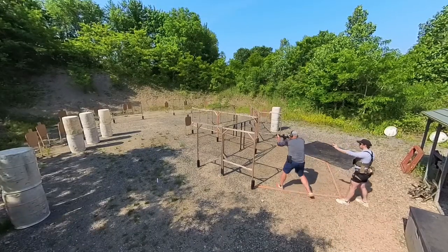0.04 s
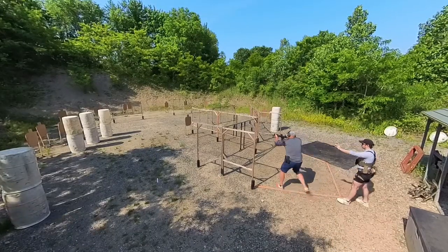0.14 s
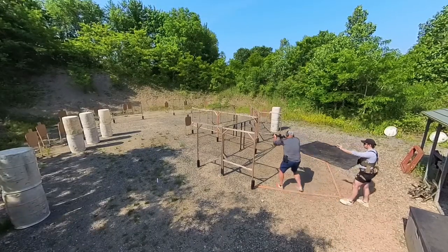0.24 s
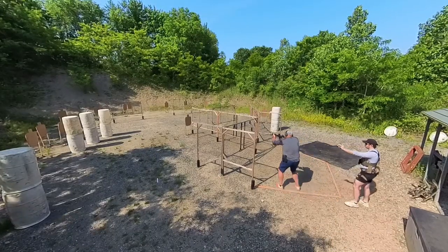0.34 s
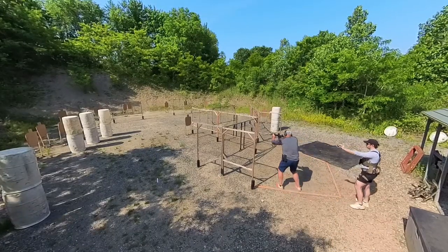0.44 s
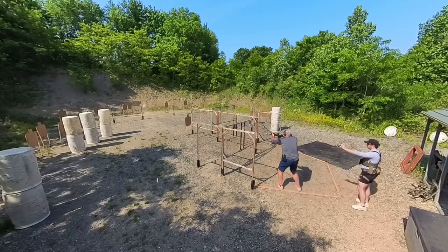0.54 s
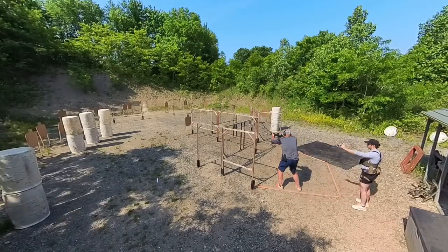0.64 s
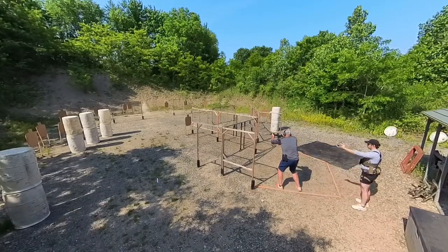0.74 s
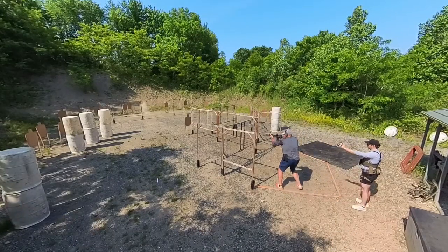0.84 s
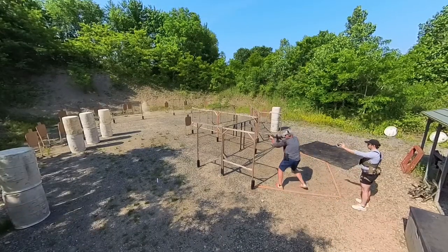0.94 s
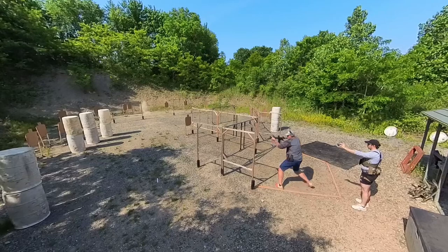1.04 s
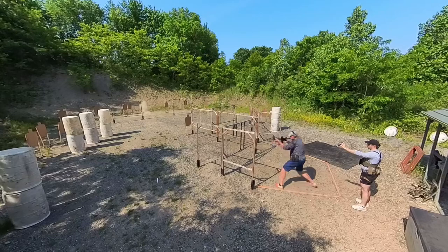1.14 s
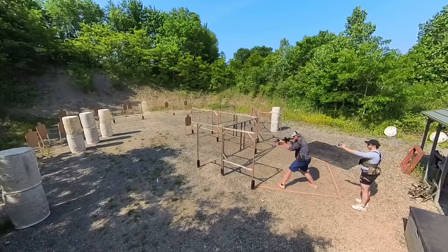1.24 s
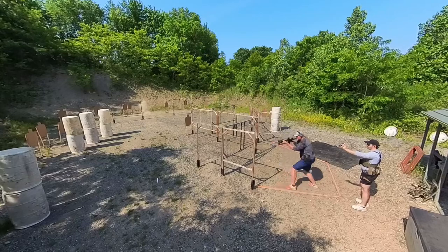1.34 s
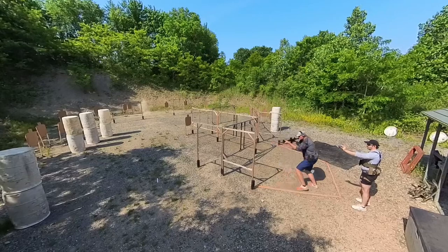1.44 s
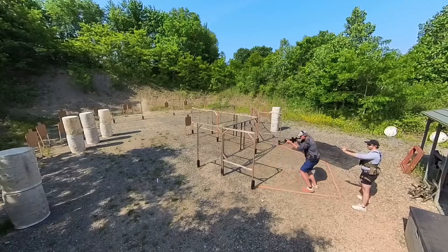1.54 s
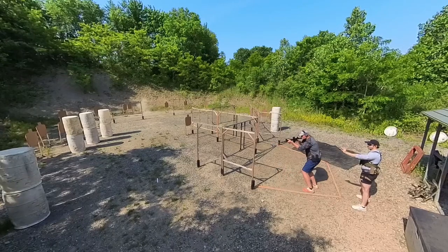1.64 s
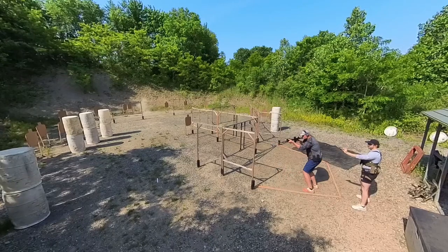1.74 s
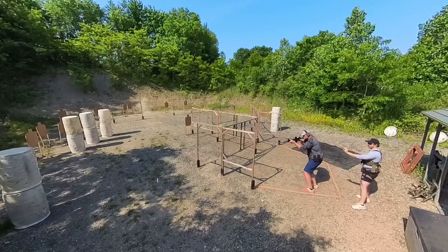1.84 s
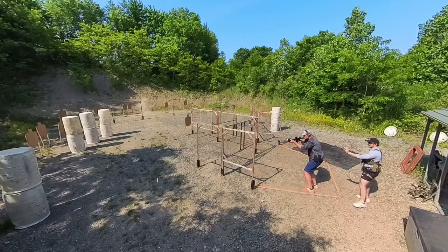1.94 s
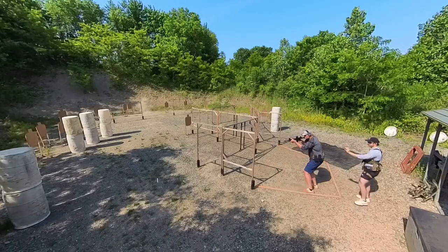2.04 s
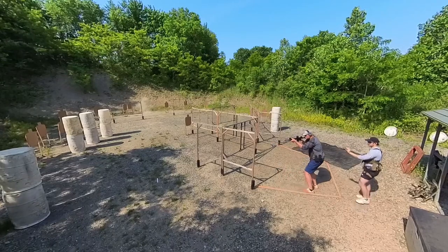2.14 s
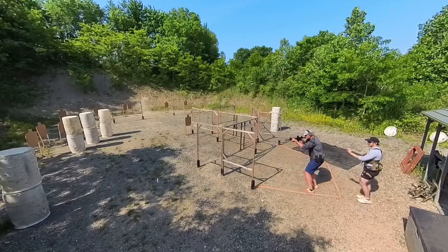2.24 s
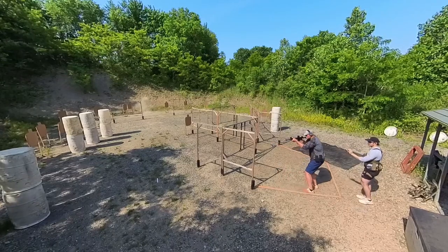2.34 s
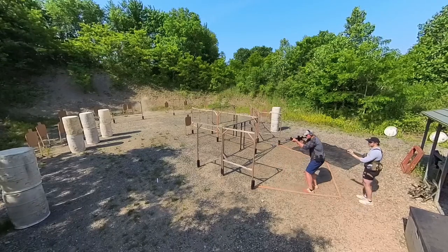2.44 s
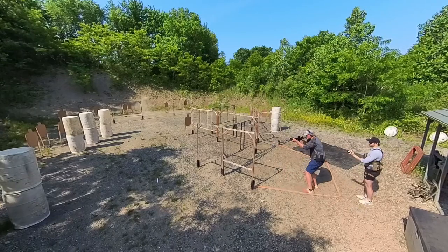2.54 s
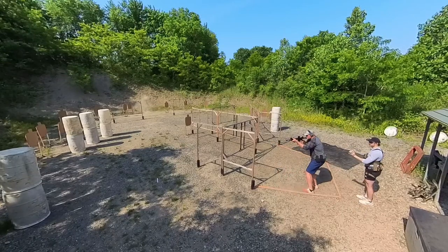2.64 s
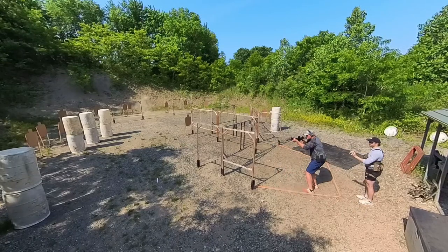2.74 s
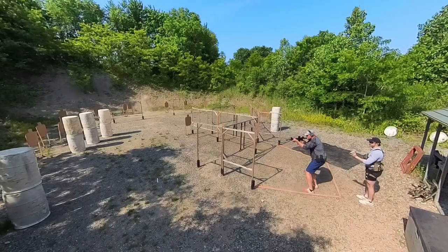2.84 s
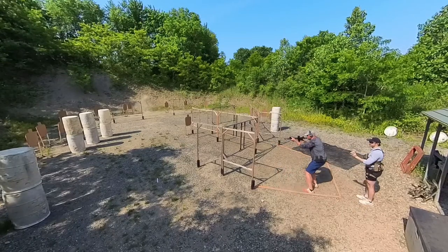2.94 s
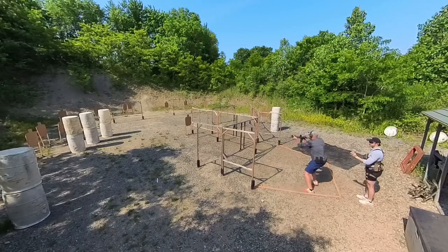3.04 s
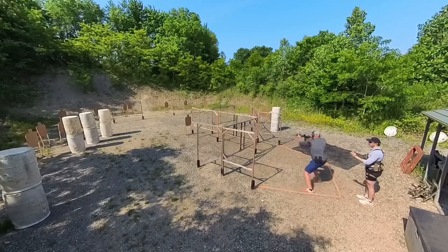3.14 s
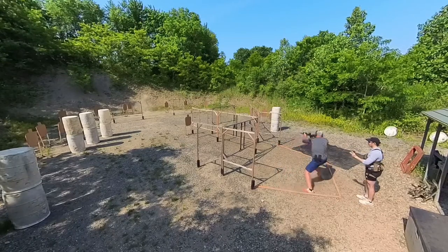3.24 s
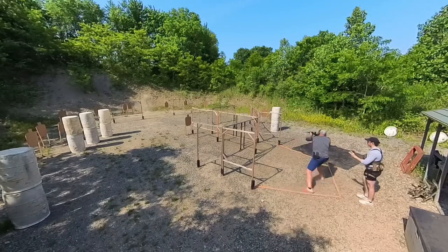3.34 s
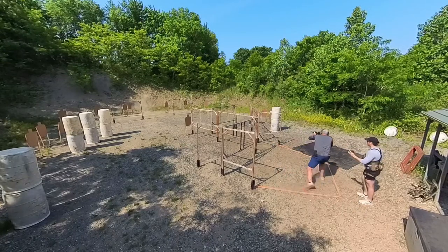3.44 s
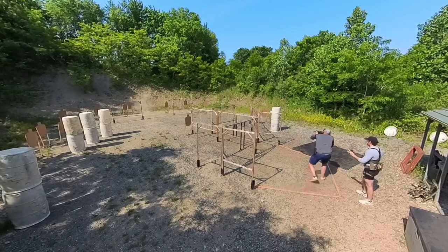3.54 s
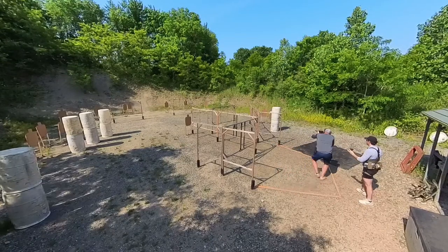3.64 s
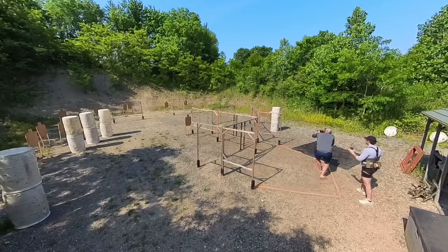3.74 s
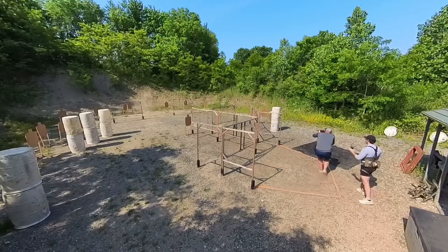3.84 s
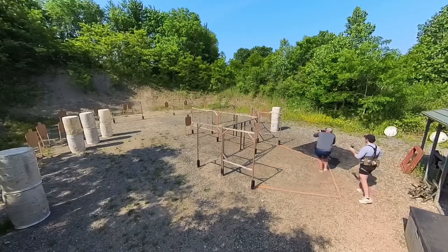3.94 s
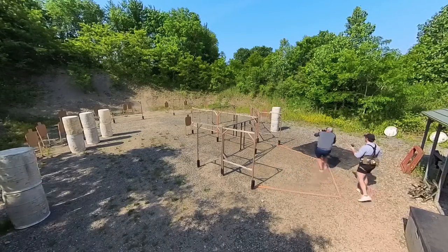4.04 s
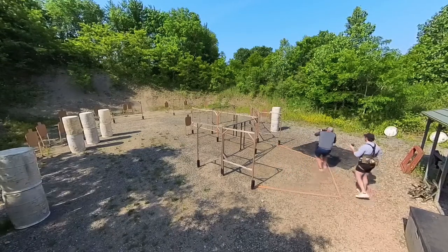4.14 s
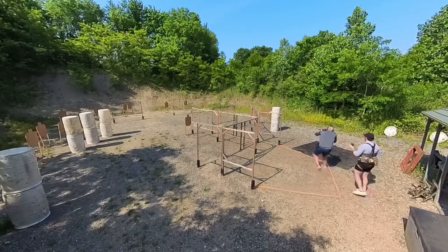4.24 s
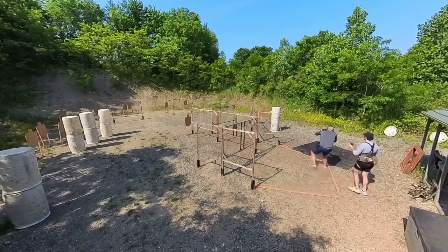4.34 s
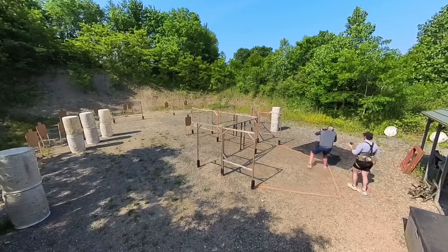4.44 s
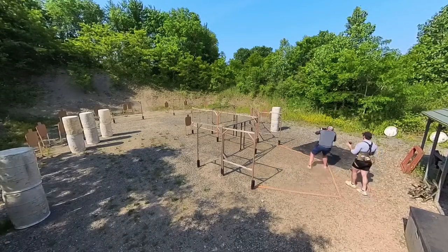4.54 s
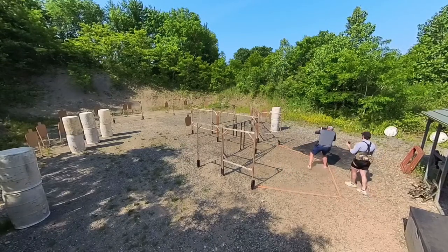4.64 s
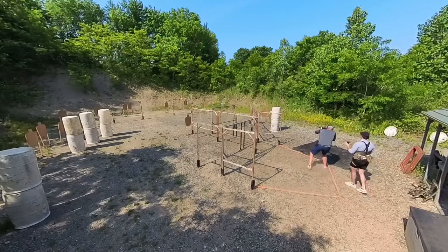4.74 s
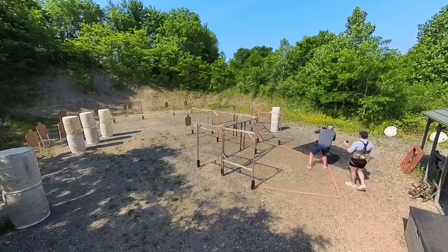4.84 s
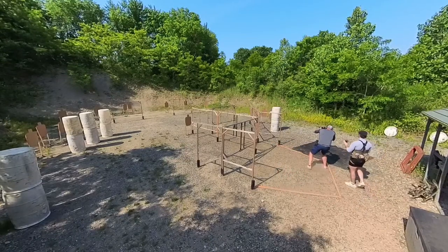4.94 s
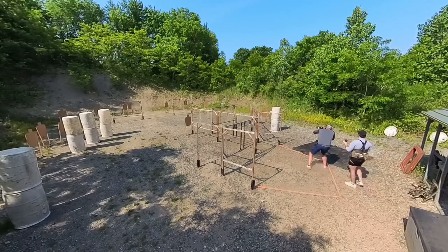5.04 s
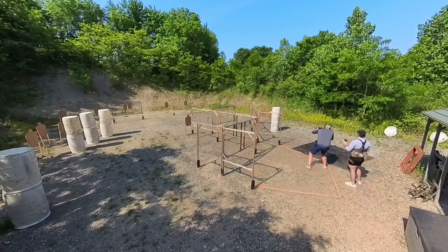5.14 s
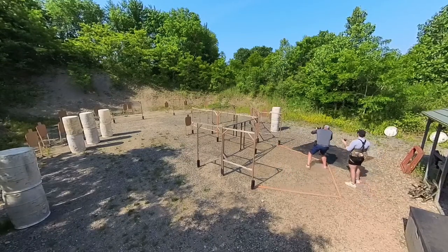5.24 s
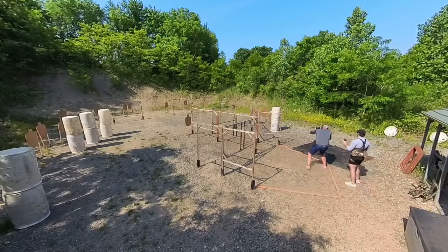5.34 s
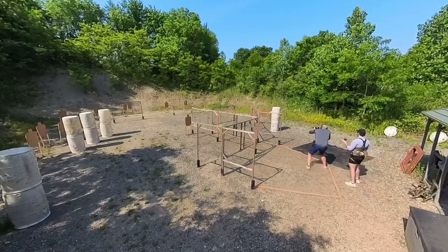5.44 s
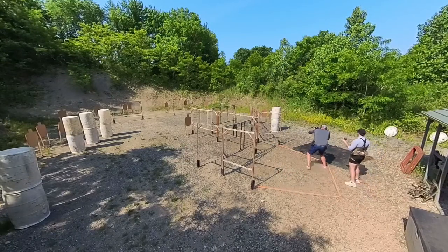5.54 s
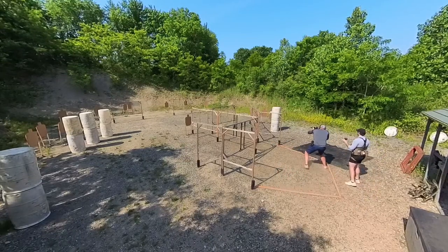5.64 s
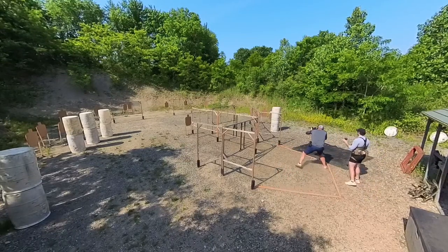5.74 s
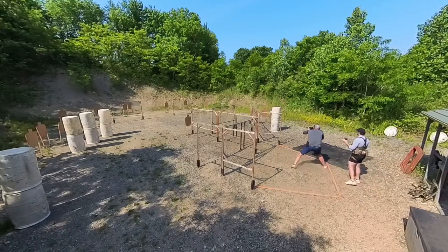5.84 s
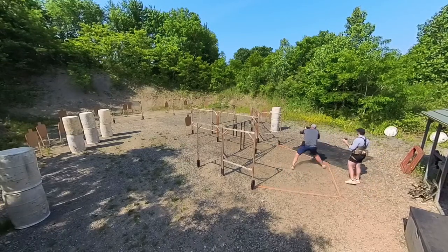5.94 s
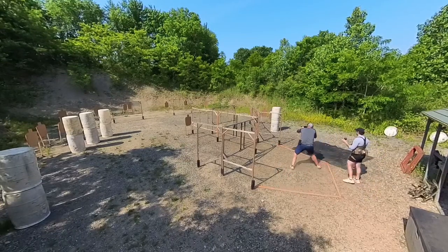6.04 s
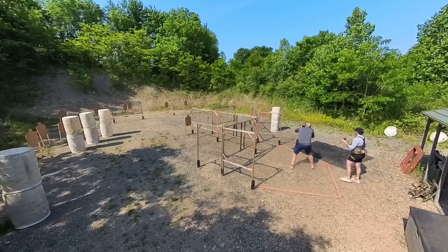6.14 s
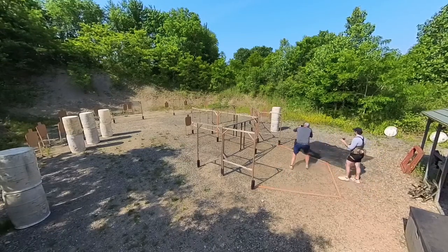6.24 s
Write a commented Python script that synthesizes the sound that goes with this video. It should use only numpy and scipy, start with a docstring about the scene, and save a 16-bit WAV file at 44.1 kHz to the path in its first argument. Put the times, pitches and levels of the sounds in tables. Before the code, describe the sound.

Twelve loud rifle shots, mostly in quick pairs, echo around an outdoor range, with gravel footsteps and spent casings tinkling between them.

```python
"""A gravel bay ringed by earth banks and trees: twelve rifle shots, mostly in quick pairs, from three
stances. Each blast is a shock wave that reflects off nearby props, rumbles between the banks and rolls
back as scattered sound from stones and foliage. Between shots the shooter's steps grind the gravel and
spent brass cases ring on the stones, over a distant drone and rustling trees.
The microphone saturates on the shock fronts, and a limiter ducks the blasts."""
import sys
import numpy as np
from scipy import signal
from scipy.fft import rfft, irfft
from scipy.io import wavfile
from scipy.ndimage import uniform_filter1d

SR = 44100
rng = np.random.default_rng(int(sys.argv[2]) if len(sys.argv) > 2 else 0)


def unload_wav(signal):
    """Save mono or channel-first audio to the path in sys.argv[1] as 16-bit WAV at rate SR, clipped to [-1, 1]."""
    wavfile.write(
        sys.argv[1],
        SR,
        np.round(np.clip(np.atleast_2d(signal).T, -1, 1) * 32767).astype(np.int16),
    )


N = 277830

# Each row: start in seconds, stance, blast gain in dB, echo gain in dB, echo body near 900 Hz in dB.
SHOTS = [(0.5386, "start", 8.5, 2, 2.5), (.6900, "start", 15, 4, 5), (1.7610, "left", 19, -2.5, 1.5),
         (1.8968, "left", 25, -1, 1), (2.3873, "left", 19, -0.5, 0.5), (2.7809, "left", 21.5, -1, 0.5),
         (4.2423, "right", 8.5, -0.5, -2), (4.3941, "right", 10.5, -1.5, 0),
         (4.7880, "right", 11, -0.5, -5), (4.9277, "right", 12, -1.5, 1), (5.5633, "right", 11, 0, -3.5),
         (5.692, "right", 13.5, -1, 0)]
# Each stance: positive phase in seconds, upper and lower cutoff in Hz, relative sizzle level in dB.
BLAST_SHAPE = {"start": (.0008, 2800, 165, -15), "left": (.0007, 5000, 65, -27),
               "right": (.0008, 1900, 200, -12)}
# Dull reflections off ground and props. Each row: stance, delay in seconds, gain in dB, cutoff in Hz.
BOUNCES = [("start", 0.00524, -1, 850), ("start", 0.0097, -6.5, 1900), ("left", 0.00393, -10.5, 2000),
           ("left", 0.0062, -0.88, 184), ("left", 0.032, -8.5, 220), ("right", .00331, -2.5, 1300),
           ("right", 0.00482, -5.5, 1200), ("right", 0.00818, -7.5, 980)]
# Slaps off barrels, props and the far bank. Each row: stance, delay in seconds, gain in dB, centre in Hz.
SLAPS = [("start", .0705, -1.5, 1800), ("start", .085, -2.7, 1500), ("start", 0.28, -11.5, 1150),
         ("left", .2435, -16, 1900), ("right", .0188, -1, 4300), ("right", 0.049, -.5, 2900),
         ("right", .075, -10.5, 1200), ("right", .229, -3.2, 2370)]
# Each stance: gain in dB, time to fall 60 dB in seconds.
THUMP_DECAY = {"start": (-17, 0.35), "left": (-25.5, 0.48), "right": (-14.5, 0.21)}
# A faint ping just before each shot, weakest in the right stance. Each stance: level in dB.
LEAD_PING_DB = {"start": -40, "left": -22, "right": -50}
# Each stance: round trip to the far bank in seconds.
BANK_DELAY_S = {"start": .206, "left": .243, "right": .229}
# Each stance: gain of the far bank's echo in dB, rise and decay times in seconds.
BANK_ECHO = {"start": (-12.5, 0.0079, 0.019), "left": (-11, 0.00042, 0.017), "right": (-8.5, 0.0016, 0.019)}
# Scattering by the gravel floor. Each stance: gain in dB, fall in dB per second.
FLOOR_ECHO = {"start": (-7, 100), "left": (-5, 79), "right": (-9.5, 89)}
# Swells from the side bank and the tree line. Each stance: round trip in seconds, gain in dB.
SIDE_ECHO = {"start": (0.14, -13.5), "left": (.14, -12), "right": (0.12, -14)}
TREE_ECHO = {"start": (.23, -20.5), "left": (0.23, -20), "right": (0.22, -14.5)}
# Each stance: gain of the woods' reverberation in dB.
WOODS_DB = {"start": -24.5, "left": -27.5, "right": -25.5}
# Each stance: treble shelf of the rolling echo in dB.
ROLL_TREBLE_DB = {"start": -2, "left": 2.5, "right": -1}
# Absorption by air and leaves. Each row: frequency in Hz, extra decay in dB per second (negative lingers).
ABSORPTION = [(100, 14), (400, -20), (1000, -1.5), (3200, 6.5), (4800, 24.5), (9000, 43)]

# Noise spectra. Each row: frequency in Hz, relative spectral density in dB.
SIZZLE_SPECTRUM = [(200, -7), (1000, 2), (3000, -1), (6300, -24), (8600, -0.5), (10500, -10.5),
                   (12000, -67)]
THUMP_SPECTRUM = [(20, -51), (60, -22), (130, -2), (220, -3.5), (380, -11.5), (800, -14), (2000, -31)]
BANK_SPECTRUM = [(100, -42), (500, -13), (1000, -0.5), (1900, 10), (3200, 3.5), (5000, -45), (10000, -79)]
FOLIAGE_SPECTRUM = [(30, -52), (60, -23), (130, -32), (260, -14.5), (480, -17.5), (850, -6.5), (1450, -3),
                    (1900, 2.5), (2450, -0.5), (3250, 0.5), (4500, -6.5), (6000, -11), (8000, -7),
                    (9400, -11), (10300, -30)]
AMBIENCE_SPECTRUM = [(25, -60), (60, -18), (100, -29), (145, 1), (200, -4.5), (500, -5.5), (1000, -12),
                     (2200, -12), (5500, -28), (8500, -15), (10800, -29), (12000, -66)]
# Stone spectra. Each row: multiple of the centre frequency, relative spectral density in dB.
GRAVEL_SPECTRUM = [(.08, -52), (.3, -6.5), (.6, -0.5), (1.2, -1.5), (2.8, -8), (6.5, -31), (11, -26),
                   (15, -32)]
KNOCK_SPECTRUM = [(.125, -11), (.65, -16.5), (1, 4), (1.43, -12), (4, -34), (8, -44)]

# Soles sliding. Each row: start in seconds, length in seconds, level in dB, centre in Hz.
SCUFFS = [(0.076, .14, -41, 1020), (0.371, 0.062, -27, 790), (1.394, 0.21, -31.5, 458),
          (1.467, 0.074, -28.5, 460), (1.619, 0.042, -28, 515), (3.39, 0.073, -34.5, 750),
          (3.519, 0.18, -37, 857), (3.806, 0.085, -23.5, 800), (3.912, 0.044, -36, 1170),
          (4.182, 0.056, -42, 790), (6.048, 0.046, -26, 487), (6.104, 0.16, -26.5, 763),
          (6.203, 0.11, -27, 716)]
# Heels landing. Each row: start in seconds, level in dB.
HEELS = [(3.736, -27.5), (3.946, -23), (4.032, -31)]
# Shuffling. Each row: start in seconds, length in seconds, crunch level in dB, tick level in dB.
WALKS = [(0, 0.28, -48.5, -52), (1.281, 0.31, -38.5, -29.5), (3.451, 0.529, -44.5, -35),
         (3.951, .28, -73, -39)]
# Stones and cases colliding. Each row: start in seconds, level in dB, centre in Hz.
CLICKS = [(.0348, -26, 8600), (0.124, -24, 1480), (1.3255, -26, 8060), (1.451, -23, 8650),
          (1.5703, -25, 8200), (1.658, -21, 870), (3.463, -27, 8000), (3.471, -28, 8500),
          (3.718, -21.5, 917), (3.735, -29, 8500), (3.7702, -19, 8700), (3.805, -20.5, 8400),
          (6.207, -15.5, 980)]
# Spent brass ringing. Each row: start in seconds, level in dB, frequency in Hz.
CASES = [(1.352, -33.5, 8720), (1.5897, -18.5, 8250), (3.555, -36, 8650), (3.8916, -35, 7650)]
# Background loudness. Each row: time in seconds, level in dB.
AMBIENCE_LEVELS = [(0, -40), (.33, -53.5), (.5, -44.5), (1.5, -43.5), (2.298, -47), (3.5, -39),
                   (4.1, -44.5), (5.398, -45), (6.3, -33.5)]


def rifle(ping_lead_s=0.0145, thump_db_per_blast_db=0.42):
    """Superposition: each shot is the sum of a faint leading ping, a blast, a thump and echoes."""
    out = np.zeros(N)
    for start, stance, blast_db, echo_db, body_db in SHOTS:
        add(out, start - ping_lead_s, amp(LEAD_PING_DB[stance]) * lead_ping())
        add(out, start, amp(blast_db) * blast(stance))
        add(out, start, amp(thump_db_per_blast_db * blast_db) * thump(stance))
        add(out, start + BANK_DELAY_S[stance], amp(echo_db) * far_bank(stance))
        add(out, start, amp(echo_db) * rolling_echo(stance, body_db))
    return out


def blast(stance, slap_span=1.84, sizzle_decay_s=0.0073):
    """Shock wave: a pressure jump gives way to suction, and reflections repeat it as filtered copies."""
    push_s, top_hz, bottom_hz, sizzle_db = BLAST_SHAPE[stance]
    t = clock(0.5)
    shock = cut((1 - t / push_s) * np.exp(-t / push_s), bottom_hz, "high")
    out = cut(shock, top_hz, "low")
    # soft earth returns little treble, small surfaces little bass
    for place, delay, db, hz in BOUNCES:
        if place == stance:
            add(out, delay, amp(db) * cut(cut(shock, hz, "low"), 55, "high"))
    for place, delay, db, hz in SLAPS:
        if place == stance:
            add(out, delay, amp(db) * cut(cut(shock, hz * slap_span, "low"), hz / slap_span, "high"))
    sizzle = colour(rng.standard_normal(len(t)), SIZZLE_SPECTRUM)  # the overloaded microphone
    return out + amp(sizzle_db) * sizzle * np.exp(-t / sizzle_decay_s)


def thump(stance, rise_s=0.003):
    """Reverberation: the blast's bass decays exponentially between the earth banks."""
    t = clock(0.65)
    bottom_hz = BLAST_SHAPE[stance][2]
    db, t60 = THUMP_DECAY[stance]
    rumble = cut(colour(rng.standard_normal(len(t)), THUMP_SPECTRUM), bottom_hz, "high")
    return rumble * (1 - np.exp(-t / rise_s)) * amp(db - 60 * t / t60)


def lead_ping(hz=3470, rise_s=0.0032):
    """Tone burst: a sinusoid swells and dies away, heard as a brief ping just before each shot."""
    t = clock(0.05)
    return np.sin(2 * np.pi * hz * t) * (t / rise_s) * np.exp(1 - t / rise_s)


def far_bank(stance):
    """Rough reflection: the far bank returns one clap, crisp when faced squarely, smeared when aslant."""
    db, rise_s, decay_s = BANK_ECHO[stance]
    t = clock(0.25)
    clap = colour(grains(len(t), uneven_db=4.0, clump_samples=40), BANK_SPECTRUM)
    return amp(db) * clap * (1 - np.exp(-t / rise_s)) * np.exp(-t / decay_s)


def rolling_echo(stance, body_db, patchy_db=2.5, ripple_db=1.0, glints_per_s=60, glint_db=16):
    """Diffuse scattering: countless echoes off gravel and leaves merge, and absorption dulls them."""
    t = clock(2)
    # a few flat stones and trunks face the microphone and stand out as glints
    glints = amp(glint_db) * rng.choice([-1, 1], len(t)) * (rng.random(len(t)) < glints_per_s / SR)
    arrivals = unit(grains(len(t), uneven_db=0.5, clump_samples=50) + glints)
    hz, delay, bands = signal.stft(arrivals, SR, nperseg=512)
    tone_db = level_at(FOLIAGE_SPECTRUM, hz)
    tone_db += level_at([(3000, 0), (6000, ROLL_TREBLE_DB[stance])], hz)
    tone_db += level_at([(200, 0), (900, body_db), (2000, 0)], hz)
    # paths of nearly equal length interfere and ripple the spectrum
    tone_db += ripple_db * unit(uniform_filter1d(rng.standard_normal(len(hz)), size=2))
    patches = uniform_filter1d(rng.standard_normal(bands.shape), size=4, axis=0)  # across frequency
    patches = unit(uniform_filter1d(patches, size=7, axis=1))  # across time
    loss_db = level_at(ABSORPTION, hz)[:, None] * (delay - 0.1537)  # relative to this delay in seconds
    bands = bands * unit(amp(tone_db))[:, None] * amp(patchy_db * patches - loss_db)
    scatter = signal.istft(bands, SR)[1][:len(t)]
    return scatter * echo_envelope(stance, t) * (1 - np.exp(-t / 0.0047))


def echo_envelope(stance, t, woods_fall_db_per_s=20.5):
    """Incoherent addition: the powers from gravel floor, side bank, tree line and woods sum."""
    floor_db, floor_fall_db_per_s = FLOOR_ECHO[stance]
    floor = amp(floor_db - floor_fall_db_per_s * t)
    side_bank = swell(t, *SIDE_ECHO[stance], sharpness=41)
    tree_line = swell(t, *TREE_ECHO[stance], sharpness=8.6)
    woods = amp(WOODS_DB[stance] - woods_fall_db_per_s * t)
    return np.linalg.norm([floor, side_bank, tree_line, woods], axis=0)


def swell(t, round_trip_s, db, sharpness):
    """Path spread: a wide surface's echo builds up to its round-trip time and ebbs more slowly."""
    trips = t / round_trip_s
    return amp(db) * (trips * np.exp(1 - trips)) ** sharpness


def footwork(heel_hz=130):
    """Friction and impact: soles scuff through gravel, and heels push dully on the ground."""
    out, t = np.zeros(N), clock(0.5)
    for start, length, db, hz in SCUFFS:
        stroke = (1 - np.exp(-t / (0.05 * length))) * np.exp(-(t / length) ** 4)
        add(out, start, amp(db) * crunch(t, hz) * stroke)
    thud = np.sin(2 * np.pi * heel_hz * t) * (t / 0.0077) * np.exp(1 - t / 0.0046)
    for start, db in HEELS:
        add(out, start, amp(db) * thud)
    return out


def shuffling(ease_s=0.018, ticks_per_s=10, tick_spread_db=4.5):
    """Random impacts: loose stones tick over a soft crunch while the shooter moves."""
    out, t = np.zeros(N), clock(0.79)
    for start, length, crunch_db, tick_db in WALKS:
        moving = np.clip(np.minimum(t, length - t) / ease_s, 0, 1)
        add(out, start, amp(crunch_db) * crunch(t, hz=794) * moving)
        hits = rng.random(len(t)) < ticks_per_s / SR
        strength = amp(tick_db + tick_spread_db * rng.standard_normal(len(t)))
        add(out, start, signal.fftconvolve(hits * strength * moving, click(hz=8900)))
    return out


def crunch(t, hz):
    """Granular friction: many stones grinding under a sole merge into uneven noise."""
    spectrum = [(ratio * hz, db) for ratio, db in GRAVEL_SPECTRUM]
    return colour(grains(len(t), uneven_db=3.5, clump_samples=60), spectrum)


def debris(case_t60_s=0.15, beat_hz=35):
    """Impact excitation: stones only click, while brass cases ring on at their natural frequencies."""
    out, t = np.zeros(N), clock(0.25)
    for start, db, hz in CLICKS:
        add(out, start, amp(db) * click(hz))
    for start, db, hz in CASES:
        # a slightly oval case mouth splits its mode into a beating pair
        ring = np.sin(2 * np.pi * hz * t) + 0.24 * np.sin(2 * np.pi * (hz + beat_hz) * t)
        add(out, start, amp(db - 60 * t / case_t60_s) * ring * (1 - np.exp(-t / 0.00058)))
    return out


def click(hz, decay_s=0.0011, tail_db=-14, tail_s=0.018, top_hz=9500):
    """Hard collision: the brief contact of two stones gives a broadband tick with a faint tail."""
    t = clock(0.25)
    knock = colour(rng.standard_normal(len(t)), [(ratio * hz, db) for ratio, db in KNOCK_SPECTRUM])
    fade = np.exp(-t / decay_s) + amp(tail_db) * np.exp(-t / tail_s)
    return cut(knock * fade, top_hz, "low", order=10)


def ambience():
    """Background noise: a low distant drone and rustling trees share one continuous spectrum."""
    level_db = np.interp(np.arange(N) / SR, *np.transpose(AMBIENCE_LEVELS))
    return amp(level_db) * colour(grains(N, uneven_db=3.0, clump_samples=500), AMBIENCE_SPECTRUM)


def grains(size, uneven_db, clump_samples):
    """Amplitude modulation: noise of wandering strength stands for dense, clumped arrivals."""
    clumps = unit(uniform_filter1d(rng.standard_normal(size), clump_samples))
    return unit(rng.standard_normal(size) * amp(uneven_db * clumps))


def colour(noise, spectrum):
    """Spectral shaping of a noise, at rms 1."""
    gain = amp(level_at(spectrum, np.fft.rfftfreq(len(noise), 1 / SR)))
    return unit(irfft(rfft(noise) * gain, len(noise)))


def cut(x, hz, kind, order=2):
    """Causal filtering, low-pass or high-pass."""
    return signal.sosfilt(signal.butter(order, min(hz, SR / 2 - 1), kind, fs=SR, output="sos"), x)


def level_at(spectrum, hz):
    """Interpolation on a logarithmic frequency axis."""
    frequencies, levels = np.transpose(spectrum)
    return np.interp(np.log(hz + 1e-6), np.log(frequencies), levels)


def amp(db):
    """Conversion from decibels to amplitude ratio."""
    return 10 ** (np.asarray(db) / 20)


def unit(x):
    """Normalisation to rms 1."""
    return x / np.sqrt(np.mean(x ** 2) + 1e-20)


def clock(length_s):
    """Uniform sampling of time, in seconds."""
    return np.arange(int(length_s * SR)) / SR


def add(mix, start_s, sound):
    """Superposition of a delayed sound on a mix."""
    part = mix[max(round(start_s * SR), 0):][:len(sound)]
    part += sound[:len(part)]


def scene():
    """Superposition: the pressures of all sources add at one microphone."""
    return (rifle() + footwork() + shuffling() + debris() + ambience())[None]


def record(dry, overload=9.1, threshold_db=-1.33, release_db_per_s=330, attack_db_per_s=1200):
    """Saturation rounds the shock fronts, a look-ahead limiter ducks peaks, and filters bound the band."""
    t = np.arange(N) / SR
    mic = overload * np.tanh(dry / overload)
    over_db = np.maximum(20 * np.log10(abs(mic[0]) + 1e-9) - threshold_db, 0)
    release_db = np.maximum.accumulate(over_db + release_db_per_s * t) - release_db_per_s * t
    attack_db = np.maximum.accumulate((over_db - attack_db_per_s * t)[::-1])[::-1] + attack_db_per_s * t
    duck_db = uniform_filter1d(np.maximum(release_db, attack_db), size=32)
    limited = cut(mic * amp(-duck_db), hz=38, kind="high")
    low_pass = signal.firwin(255, cutoff=11200, window=("kaiser", 7), fs=SR)
    return signal.oaconvolve(limited, low_pass[None], "same")


dry = scene()
out = record(dry)
unload_wav(out)
```